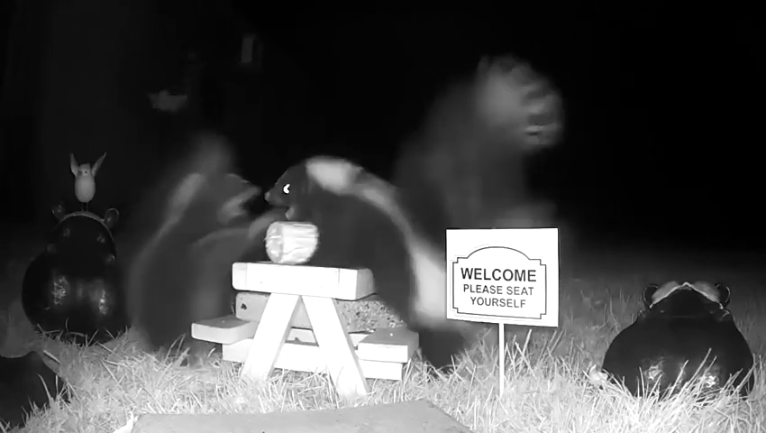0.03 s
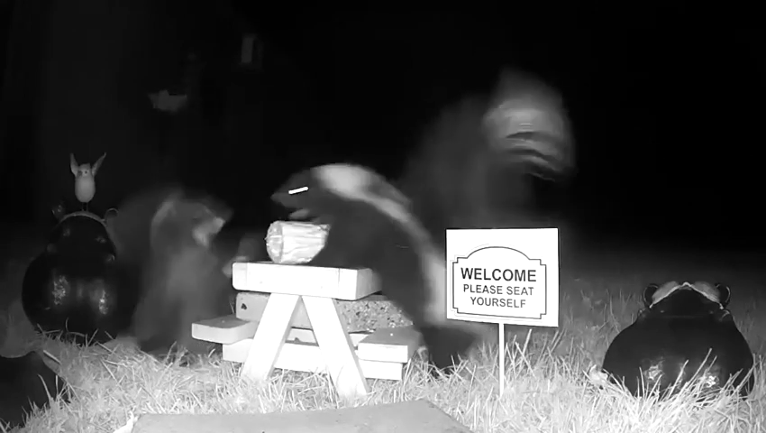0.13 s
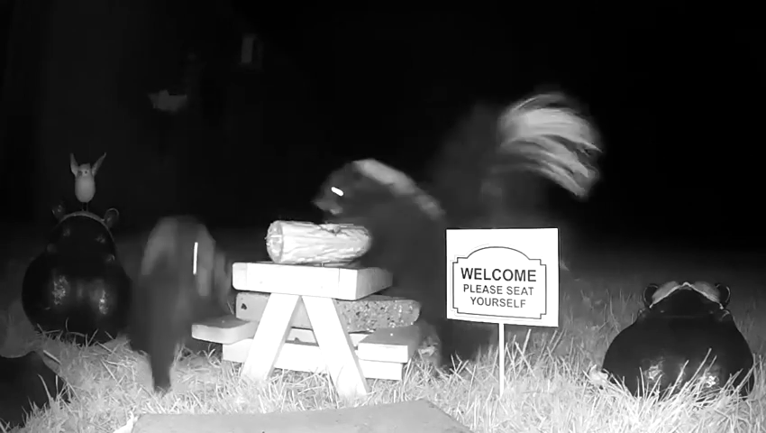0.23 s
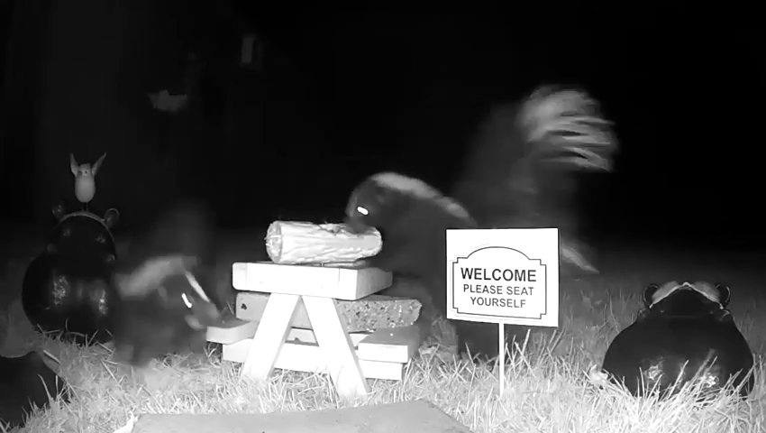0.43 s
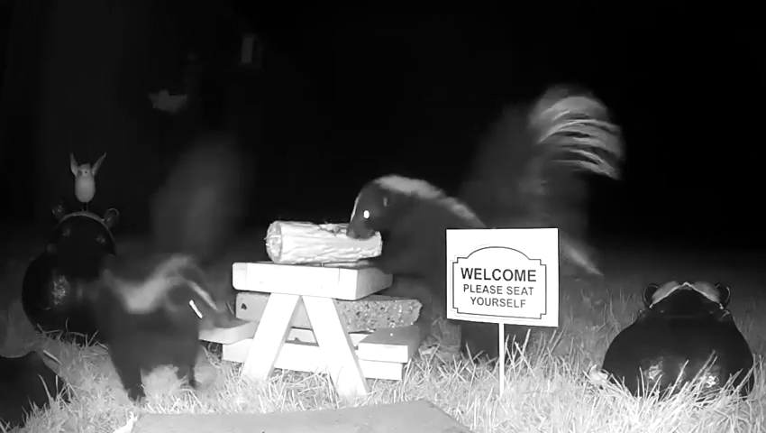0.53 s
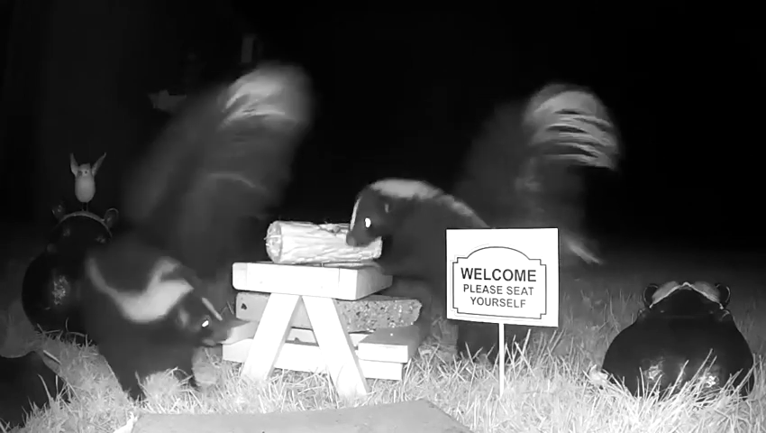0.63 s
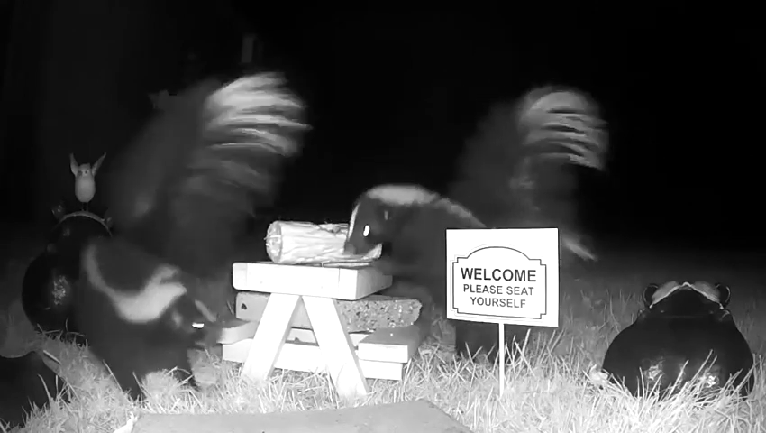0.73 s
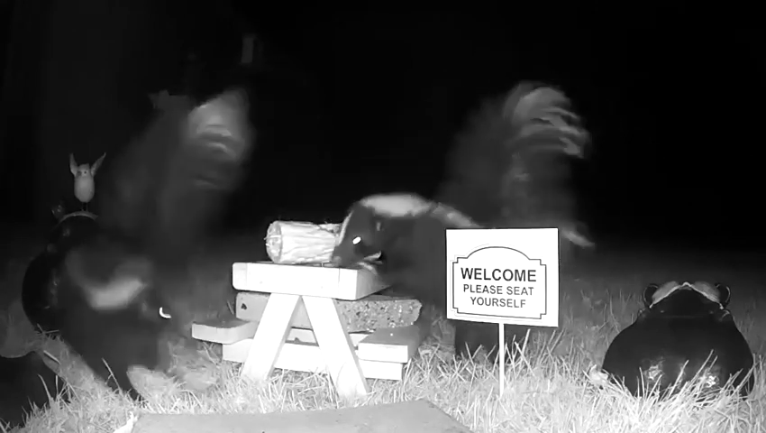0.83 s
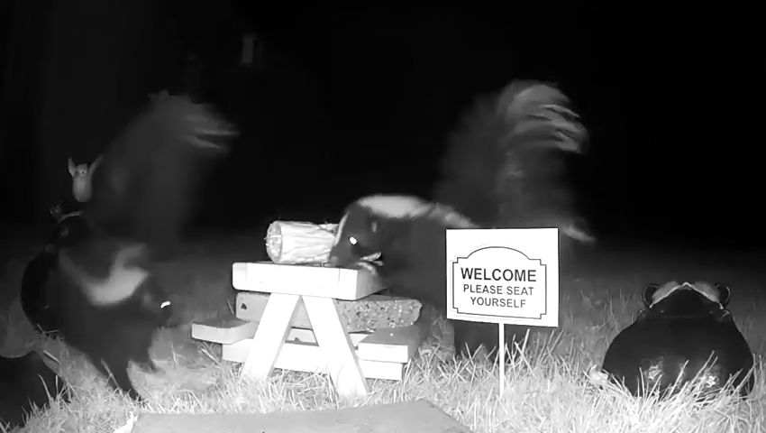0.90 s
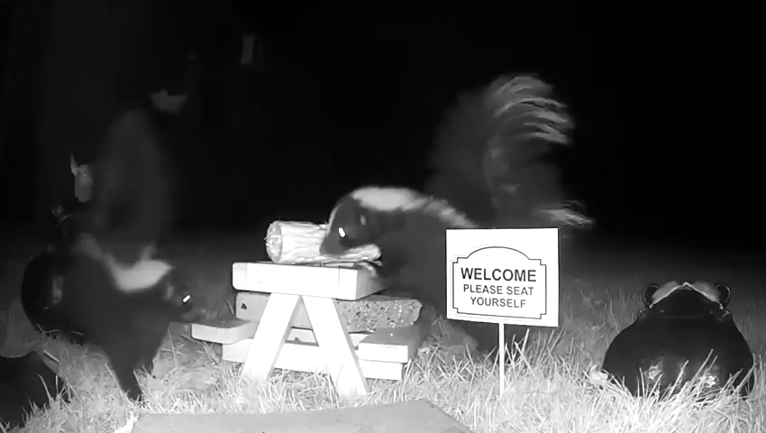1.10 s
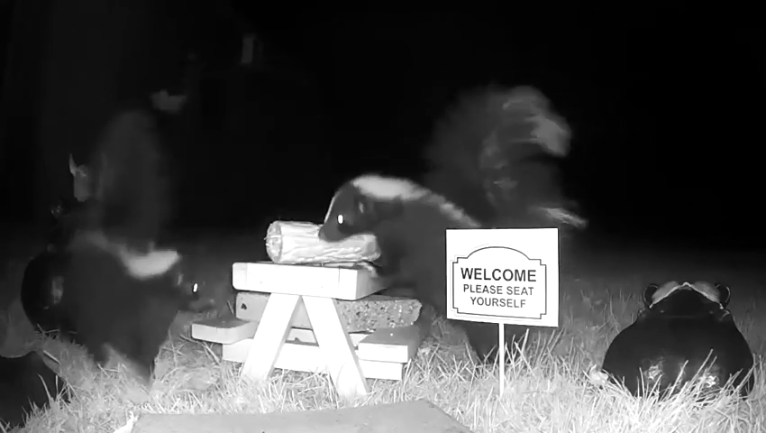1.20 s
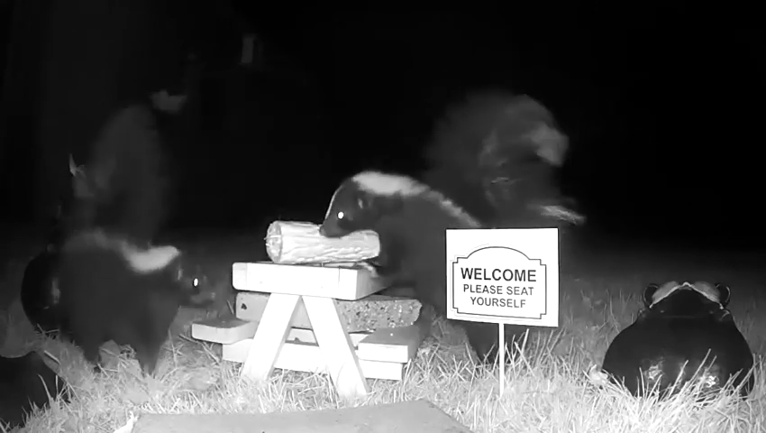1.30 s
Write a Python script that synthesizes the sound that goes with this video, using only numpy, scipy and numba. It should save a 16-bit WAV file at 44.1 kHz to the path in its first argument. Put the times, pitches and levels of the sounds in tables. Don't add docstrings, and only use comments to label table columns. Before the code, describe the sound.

Two very brief, high, rasping skunk squeals about a third of a second apart, with grass crackle, soft paw thuds and a wooden knock, then mostly quiet hiss and low rumble in an open yard.

```python
import sys
import numpy as np
from scipy import signal
from scipy.fft import rfft, irfft
from scipy.io import wavfile
from scipy.ndimage import uniform_filter1d
from numba import njit

SR = 44100
rng = np.random.default_rng(int(sys.argv[2]) if len(sys.argv) > 2 else 0)


def undo_db(level):
    steps = np.asarray(level, float) / 20
    return 10 ** steps


def dump_mix(stems):
    frames = np.atleast_2d(stems).T
    limited = np.clip(frames, -1, 1)
    pcm = np.round(limited * 32767).astype(np.int16)
    wavfile.write(sys.argv[1], SR, pcm)


N = 59535

# (time [s], level [dB], mouth pitch [Hz], mouth ring width [Hz], throat level [dB], nose level [dB])
FIRST_SQUEAL = [(0.205, -22.5, 3830, 700, -36, -9.5), (0.211, -26.5, 4750, 1100, -4.5, -12.5),
                (0.2183, -21.5, 4970, 900, -10.5, -13.5), (.222, -34.5, 4500, 900, -15, -5.5),
                (0.2265, -20.5, 5120, 1300, -25.5, -18.5), (0.2274, -13.5, 4990, 1000, -16, -14),
                (0.2324, -12.5, 4830, 600, -18.5, -16), (0.2337, -21.5, 4630, 550, -9, -12),
                (0.2374, -30.5, 4520, 800, -19.5, -3)]
SECOND_SQUEAL = [(0.5374, -18.5, 3980, 1016, 5, -7), (0.541, -28.5, 4360, 1000, 3, 3.5),
                 (0.55, -25, 4450, 1000, 1.5, -7), (0.556, -22, 4700, 950, -15, -10),
                 (0.56, -19.5, 4960, 1024, -13, -15), (.569, -26, 4970, 900, -10, -14),
                 (0.5727, -20.5, 4690, 1000, -25.5, -12), (0.5788, -11.5, 4790, 1000, -26, -27),
                 (0.5799, -28.5, 4400, 910, -8, -11)]
# (time [s], pulse rate [Hz])
FIRST_PACE = [(.2048, 495), (.2149, 667), (.2179, 470), (.2264, 530), (.2283, 680), (.2356, 435)]
SECOND_PACE = [(.5382, 476), (.5403, 349), (.5489, 309), (.5586, 390), (.5714, 455), (.5736, 571),
               (.5771, 370)]
# (middle [s], half length [s], level [dB], pitch [Hz], width [Hz])
SOFT_SWELLS = [
    (.285, .03, -58, 3950, 700),
    (.935, .025, -58, 6400, 3000),
    (.59, 0.0099, -48, 3800, 1997),
    (.605, 0.017, -46.5, 4270, 3000),
    (.628, 0.018, -48.5, 4700, 2500),
    (0.678, 0.051, -64.5, 3580, 403),
]
# (time [s], level [dB], pitch [Hz],
# length [s])
STAMPS = [
    (.575, -30.5, 382.5, 0.015),
    (.589, -54.5, 320, 0.036),
    (.237, -46, 870, 0.016),
    (.195, -54.5, 330, 0.035),
    (0.32, -63, 295, 0.017),
    (.222, -53, 680, 0.013),
    (.6, -58, 301, 0.047),
    (.0005, -48, 376, 0.0089),
          (.895, -60, 350, .03),
    (.925, -56, 350, .035),
]
# (middle [s], half length [s], level [dB], level of dull stalks [dB])
SWISHES = [(.008, 0.013, -49.5, 3), (0.052, 0.022, -53, 0.5), (.095, .025, -45.5, -3.5),
           (0.148, .018, -47, -3.5), (0.204, 0.019, -52, -3), (0.242, 0.021, -43, -7),
           (.31, .025, -54.5, 0.5), (0.37, 0.026, -50.5, 2.5), (0.48, 0.066, -56.5, -5),
           (0.587, 0.019, -46.5, -3.5), (0.621, 0.021, -49.5, -11.5), (0.936, 0.04, -60, 0)]
# (time [s], peak level [dB], pitch [Hz])
SNAPS = [(.0004, -49.5, 6500), (0.0126, -40.5, 5500), (.073, -43.5, 6800), (0.0903, -34, 6820),
         (.142, -41, 6960), (0.152, -46.5, 6820), (0.1804, -33.5, 6200), (0.2946, -47, 5500),
         (0.318, -37.5, 6270), (0.3458, -41, 6890), (0.4615, -42, 6810), (0.4747, -46, 6000),
         (0.48, -53, 5670), (0.4883, -43, 6940), (0.53, -40.5, 6900), (0.048, -44, 1050),
         (0.057, -46, 1000), (0.103, -40, 2300), (0.346, -42.5, 2000), (0.374, -46, 1250),
         (0.18, -47.5, 1300), (.531, -44, 3800), (.183, -38.5, 2380), (.538, -39, 2300)]
# (frequency [Hz], level per Hz [dB])
GRASS_COLOUR = [(88, -41.5), (150, -5.5), (572, -10.5), (967, -1), (2290, -2), (3110, -9), (7020, 0),
                (7770, -9), (8600, -58.5), (11200, -84), (18900, -120)]
# (frequency [Hz], level per Hz [dB])
HISS_COLOUR = [(88, -28.5), (150, -8.5), (401, -5.5), (459, -9), (701, -9.5), (4220, -8.5), (4590, -9.5),
               (7260, -1.5), (8600, -21), (11200, -63), (18900, -120)]
# (pitch [Hz], width [Hz], level [dB])
CASE_RINGS = [(4300, 400, -17), (5750, 400, -16)]
# (time [s], level [dB])
RUMBLE = [(0.0, -64), (0.032, -57.5), (0.082, -71), (0.25, -54), (0.278, -61.5), (0.788, -66.5),
          (1.35, -68)]


def evened(x):
    return x / np.sqrt(np.mean(x ** 2) + 1e-20)


def along(curve, t):
    columns = np.transpose(curve)
    return [np.interp(t, columns[0], column) for column in columns[1:]]


def colour(x, points):
    point_hz, point_db = np.transpose(points)
    hz = np.fft.rfftfreq(len(x), 1 / SR)
    db = np.interp(np.log(hz + 1), np.log(point_hz + 1), point_db)
    return evened(irfft(rfft(x) * undo_db(db), len(x)))


def add(mix, start_s, sound):
    part = mix[max(round(start_s * SR), 0):][:len(sound)]
    part += sound[:len(part)]


@njit
def smooth(x, pole):
    out, a, b, c = np.zeros_like(x), 0j, 0j, 0j
    for n in range(len(x)):
        a = pole[n] * a + (1 - pole[n]) * x[n]
        b = pole[n] * b + (1 - pole[n]) * a
        c = pole[n] * c + (1 - pole[n]) * b
        out[n] = c
    return out


def resonate(x, hz, width_hz):
    one = np.ones(len(x))
    turn = np.exp(2j * np.pi * np.cumsum(hz * one) / SR)
    pole = np.exp(-np.pi * np.clip(width_hz, 30, 8000) * one / SR)
    return 2 * (turn * smooth(x / turn, pole)).real


def squeal(pace, curve, throat_hz, nose_hz, rough, shut, first, palate_db):
    start, end = pace[0][0], curve[-1][0]
    t = start + np.arange(2400) / SR
    db, mouth_hz, mouth_width, throat_db, nose_db = along(curve, t)
    times, rates = np.transpose(pace)
    rate_hz = rates[np.searchsorted(times, t, "right") - 1]
    turns = np.cumsum(rate_hz) / SR

    jitter, shimmer_db = .012, 1.5
    chance = rng.standard_normal((40, 2))
    pulse_s = np.interp(np.arange(40) + jitter * abs(chance[:, 0]), turns, t)
    clicks = np.sinc((t - pulse_s[:, None]) * SR / 2) / 2
    pulses = undo_db(shimmer_db * chance[:, 1]) @ clicks * np.sqrt(SR / rate_hz)

    puffs = (0.1 + np.exp(-(turns % 1) / .3)) * rng.standard_normal(len(t))
    drive = ((1 - rough) * pulses + rough * puffs) * undo_db(db) * (t < end)
    drive = drive * np.minimum(first + (t - start) / .0025, 1)

    throat_hz = throat_hz * (1 - (1 - shut) * np.exp(-(t - start) / 0.0085))
    late_drive = np.roll(drive, 45)
    nose_width = 650
    rings = [(drive, 0, mouth_hz, mouth_width),
             (late_drive, throat_db, throat_hz, 500),
             (drive, nose_db, nose_hz, nose_width),
             (drive, nose_db + palate_db, 7450, nose_width),
             (drive, -30, 2300, 290)]
    voice, sign = 0, 1
    for push, ring_db, hz, width_hz in rings:
        voice = voice + sign * resonate(push * undo_db(ring_db), hz, width_hz) * np.sqrt(SR / width_hz)
        sign = -sign
    return start, voice


def soft_swells():
    now, out = np.arange(N) / SR, np.zeros(N)
    for middle, half, db, hz, width_hz in SOFT_SWELLS:
        swell = np.exp(-((now - middle) / half) ** 2)
        out += undo_db(db) * swell * evened(resonate(rng.standard_normal(N), hz, width_hz))
    return out


def stamps():
    out = np.zeros(N)
    for start, db, hz, length in STAMPS:
        t = np.arange(0, length, 1 / SR)
        drift = evened(uniform_filter1d(rng.standard_normal(6000), 200))[:len(t)]
        tone = np.sin(2 * np.pi * np.cumsum(hz * (1 + 0.05 * drift)) / SR)
        swell = np.sin(np.pi * (t / length) ** .7)
        add(out, start, undo_db(db) * swell * tone)
    return out


def grass():
    blades_per_s, blade_spread_db, blade_share = 2500, 3, .5
    noise = rng.standard_normal((3, N))
    strength = undo_db(blade_spread_db * np.minimum(rng.exponential(1, N), 4))
    hits = strength * (rng.random(N) < blades_per_s / SR)
    blades = signal.lfilter([1], [1, -.93], hits) * noise[0]
    brush = colour(blade_share * evened(blades) + (1 - blade_share) * noise[1], GRASS_COLOUR)
    dull = signal.sosfiltfilt(signal.butter(2, 3000, fs=SR, output="sos"), brush)
    bright = brush - dull

    now, out = np.arange(N) / SR, np.zeros(N)
    for middle, half, db, dull_db in SWISHES:
        swell = np.exp(-((now - middle) / half) ** 2)
        out += undo_db(db) * swell * (bright + undo_db(dull_db) * dull)

    t = np.arange(900) / SR
    for start, db, hz in SNAPS:
        t60 = 0.01 * np.sqrt(6000 / hz)
        crack = rng.standard_normal(900) * np.minimum(t / 0.0017, 1) * undo_db(-60 * t / t60)
        ring = resonate(crack, hz, hz * .45)
        add(out, start, undo_db(db - 0.5) * ring / abs(ring).max())
    return out


def yard(x):
    t = np.arange(SR // 2) / SR
    taps = rng.choice([-1., 1.], (3, len(t))) * (rng.random((3, len(t))) < .06) * (t > .001)
    layers = [(-16, undo_db(-60 * t / .05)),
              (-38, np.exp(-((t - .056) / .016) ** 2)),
              (-31, undo_db(-60 * t / .3))]
    tail = np.zeros(len(t))
    for (db, shape), bounces in zip(layers, taps):
        echo = bounces * shape
        tail += undo_db(db) * echo / np.linalg.norm(echo)
    return x + signal.fftconvolve(x, tail)[:N]


def microphone():
    noise = rng.standard_normal((3, N))
    hiss = colour(noise[0], HISS_COLOUR)
    hiss = hiss + undo_db(-9) * evened(resonate(noise[1], 2300, 500))
    for hz, width_hz, db in CASE_RINGS:
        hiss = hiss + undo_db(db) * evened(resonate(noise[1], hz, width_hz))

    z = signal.stft(hiss, nperseg=512)[2]
    patches = uniform_filter1d(rng.standard_normal(z.shape), size=5, axis=0)
    patches = evened(uniform_filter1d(patches, size=10, axis=1))
    hiss = signal.istft(z * undo_db(2.2 * patches), nperseg=512)[1][:N]

    rumble_hz = 75.6
    band = signal.butter(1, [rumble_hz / 4, rumble_hz], "band", fs=SR, output="sos")
    low = evened(signal.sosfilt(band, signal.lfilter([1], [1, -.98], noise[2])))
    rumble_db = along(RUMBLE, np.arange(N) / SR)[0]
    return undo_db(-60) * hiss + undo_db(rumble_db) * low


def scene():
    calls = stamps()
    add(calls, *squeal(FIRST_PACE, FIRST_SQUEAL, throat_hz=3980, nose_hz=6280,
                       rough=.1, shut=.97, first=.9, palate_db=-11))
    add(calls, *squeal(SECOND_PACE, SECOND_SQUEAL, throat_hz=3557, nose_hz=6720,
                       rough=.28, shut=.88, first=.3, palate_db=-3))
    return (yard(calls) + grass() + microphone() + soft_swells())[None]


def top_cut(x):
    return signal.sosfilt(signal.butter(12, 8920, fs=SR, output="sos"), x)


def record(dry):
    low_pass = signal.firwin(201, 7896, window=("kaiser", 8.5), fs=SR)
    mix = signal.oaconvolve(dry, low_pass[None], "same")
    return top_cut(mix)


dry = scene()
out = record(dry)
dump_mix(out)
```